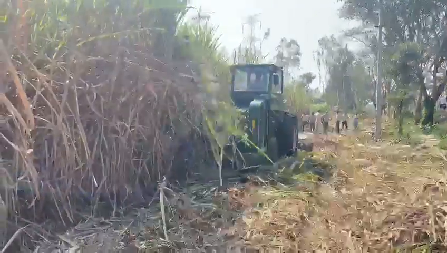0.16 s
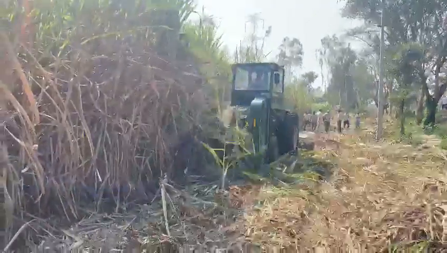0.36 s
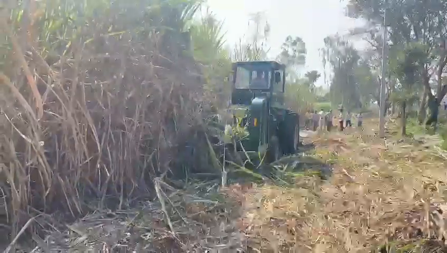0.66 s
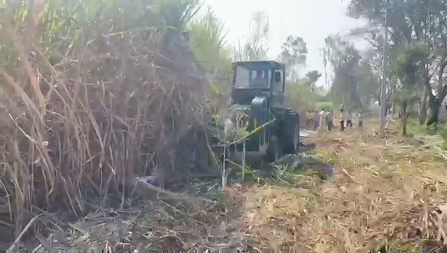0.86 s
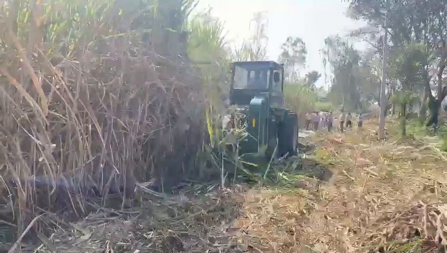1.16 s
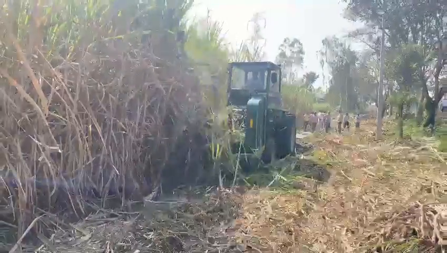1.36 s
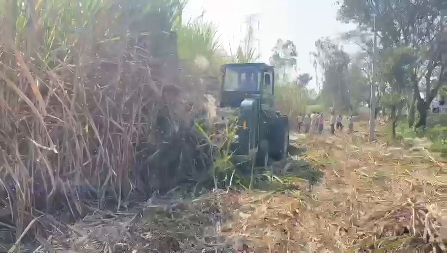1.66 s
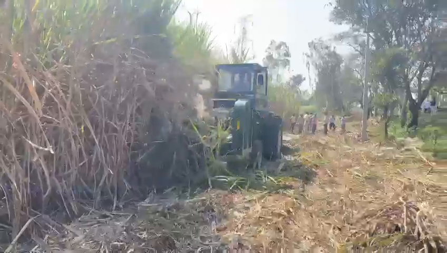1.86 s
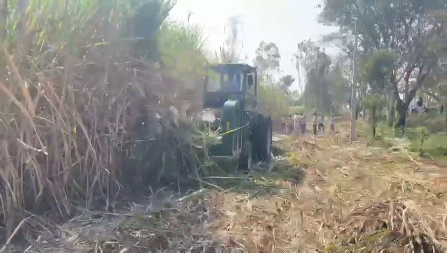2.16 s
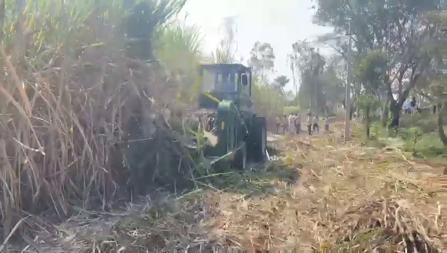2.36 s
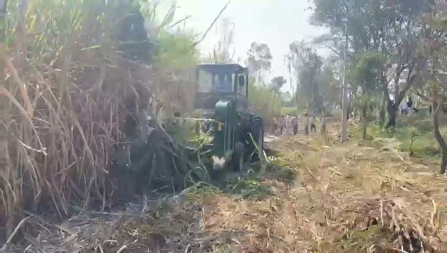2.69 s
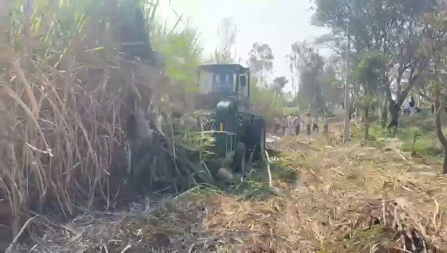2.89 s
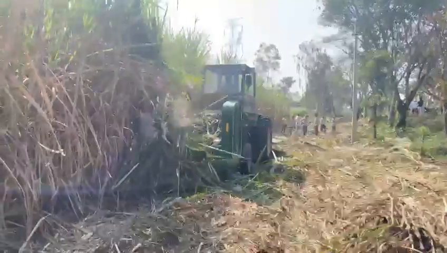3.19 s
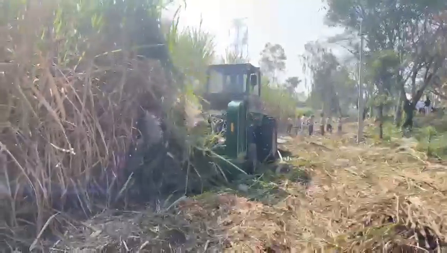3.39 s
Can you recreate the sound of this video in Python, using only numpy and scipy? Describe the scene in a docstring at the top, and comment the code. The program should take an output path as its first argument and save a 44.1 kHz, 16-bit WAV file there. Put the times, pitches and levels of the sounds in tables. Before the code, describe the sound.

A cane harvester roars steadily, its diesel throbbing as blades knock and dry cane crackles

```python
"""A cane field: a cane harvester works some way off from a phone with two microphone ports.
Sine tones make the six-cylinder diesel's throb, the pumps and the fan; noise puffing with each firing
makes the roar over bare ground. Decaying sines make thuds and blade knocks, dense grains snap cane,
and torn dry leaves are noise and clicks hissing in gusts."""
import sys
import numpy as np
from scipy import signal
from scipy.fft import rfft, irfft
from scipy.io import wavfile
from scipy.ndimage import uniform_filter1d

SR = 44100
rng = np.random.default_rng(int(sys.argv[2]) if len(sys.argv) > 2 else 0)


def gain_from_decibels(decibels):
    """Convert decibel values to linear amplitude factors."""
    exponent = np.asarray(decibels, float) / 20
    return 10 ** exponent


def waveform_to_disk(signal):
    """Save audio, clipped to [-1, 1], as 16-bit WAV at the path in sys.argv[1]."""
    frames = np.transpose(np.atleast_2d(signal))
    scaled = np.clip(frames, -1, 1) * 32767
    samples = np.round(scaled).astype(np.int16)
    wavfile.write(sys.argv[1], SR, samples)


N = 156114
HZ = np.maximum(np.fft.rfftfreq(N, 1 / SR), 1)

# Source levels are ahead of the gains in ports() and scene().
# Exhaust tones. Each row: multiple of the engine cycle, level in dB, level wander in dB.
EXHAUST_ORDERS = [(4, -42, 2), (7, -37, -3.5), (8, -37.5, 0.5), (9, -35, 2.5), (10, -39, 4.5),
                  (12, -38.5, 2)]
# Firing tone. Each row: time in seconds, level in dB.
FIRING_LEVEL = [(0.0, -27.5), (0.34, -23.5), (0.8, -26.5), (0.92, -39), (1.3, -33.5), (1.6, -29.5),
                (1.88, -45), (1.99, -26), (2.07, -36), (2.28, -27), (2.45, -27.5), (2.8, -27),
                (2.92, -30.5), (3.19, -26), (3.4, -26.5), (3.54, -33)]
# Hydraulic pumps and fan: pitches in Hz.
HUM_HZ = (385.3, 806.8)
# The same hums. Each row: level in dB, pitch wander as a share, level wander in dB.
HUMS = [(-31, .0008, 0.4), (-43, 0.003, 1)]
# Wavering pump hum. Each row: time in seconds, level in dB.
PUMP_LEVEL = [(0.0, -33), (0.5, -35), (0.9, -34), (1.25, -34.5), (1.45, -28), (1.65, -34), (2.1, -35),
              (2.26, -27.5), (2.36, -37), (2.8, -36), (3.54, -33)]
# Machine roar spectrum. Each row: frequency in Hz, relative density in dB per Hz.
ROAR_COLOUR = [(20, -44), (32, -31), (42, -18), (55, -2), (70, -3), (105, -4.5), (150, -3), (280, -7.5),
               (385, -10), (480, -7), (640, -3), (790, -12.5), (1000, -8), (1500, -10), (2000, -9),
               (3000, -14.5), (4500, -22), (7000, -42.5), (12000, -28)]
# Machine roar. Each row: time in seconds, level in dB, tilt in dB per octave.
ROAR_LEVEL = [(0, -19.5, -.5), (.33, -19.5, 0.5), (.8, -19, -0.5), (1.2, -19.5, -0.5), (1.75, -18, 0.6),
              (2.1, -18, -0.5), (2.6, -21, 0.9), (2.86, -21, 0.2), (3.2, -20.5, 0.3), (3.54, -19.5, 1)]
# Cut cane landing in the machine. Each row: start in seconds, peak in dB, pitch in Hz.
THUDS = [(1.43, -19, 153), (1.87, -19, 154), (2.13, -12.5, 95), (2.84, -14.5, 621)]
# Snapping cane. Each row: time in seconds, level in dB.
SNAP_LEVEL = [(0.0, -27.5), (0.38, -30), (0.8, -31.5), (1.2, -30.5), (1.5, -26.5), (1.8, -27), (2.3, -31.5),
              (2.8, -33.5), (3.1, -30), (3.3, -28.5), (3.54, -31)]
# Snap grains. Each row: pitch in Hz, relative level in dB.
SNAP_GRAINS = [(1300, -9), (1900, -4), (2900, 1.5), (3500, 3), (4500, 3)]
# Torn leaf spectrum. Each row: frequency in Hz, relative density in dB per Hz.
LEAF_COLOUR = [(800, 7), (2000, 4), (3000, -7), (4500, 2), (6000, -2.5), (8000, -0.5), (11000, 0),
               (13000, -6)]
# Torn leaves. Each row: time in seconds, level in dB, extra tilt in dB per octave.
LEAF_LEVEL = [(0.0, -29.5, -0.5), (0.1, -31, -1), (0.5, -33, 0), (0.9, -30, -0.5), (1.2, -32.5, -1),
              (1.6, -27, 1.5), (1.81, -25, 1), (1.9, -28.5, -0.5), (2.3, -25.5, -1), (2.64, -25.5, 0),
              (2.78, -28, -1), (2.85, -25.5, -1), (3.1, -26.5, -0.5), (3.28, -28.5, 2), (3.33, -23, -0.5),
              (3.39, -28.5, 0), (3.54, -26.5, 0)]
# Stalk and blade modes. Each row: multiple of the ring pitch, relative level in dB, T60 in seconds.
STALK_MODES = [(0.93, -0.5, .015), (1.04, 3.5, 0.021), (1.2, -1, 0.016), (1.45, 0.5, 0.017), (1.7, -3, .01),
               (2, 3, 0.021), (2.9, -15, 0.009), (3.3, -5, 0.016)]
# Blade knocks, mostly loud, one faint. Each row: start in seconds, peak in dB, ring pitch in Hz.
KNOCKS = [(0.153, -8.5, 930), (0.3, -1.5, 995), (1.007, -24, 1300), (1.694, -9, 1670), (1.811, -10.5, 1420),
          (1.966, -10, 1090), (2.101, -7, 1420), (2.374, -12, 915), (2.806, -6, 1460)]
# Ground echo delays in seconds: left port, right port.
GROUND_S = (2.1e-4, 1.83e-4)
# Scattered sound, unlike at the two ports. Each row: frequency in Hz, gain in dB.
SCATTER_COLOUR = [(50, -9.5), (300, -10), (1000, -8), (3000, -5), (6000, 8.5), (10000, -11)]
# Machine balance drift. Each row: time in seconds, left minus right in dB.
MACHINE_PAN = [(0, -3), (1.1, -3), (2.0, -2), (2.6, -2), (3.54, -3)]
# Shading by the phone's body. Each row: frequency in Hz, extra left minus right in dB.
MACHINE_SHADE = [(60, -0.1), (200, -0.1), (400, -1), (700, -0.9), (1300, .3), (3000, 3), (8000, -3.5)]
# Colour of the sum of the ports. Each row: frequency in Hz, gain in dB.
SUM_COLOUR = [(2000, 0), (2500, -2.5), (2900, 3.5), (4500, -3), (5300, -4.5), (6000, -11.5), (6500, 2),
              (7900, -1.5), (8400, -3), (9000, -3), (9500, -9), (9800, 0), (11600, 2), (11880, -12),
              (12050, -70)]
# Colour of the difference of the ports, ending lower. Each row: frequency in Hz, gain in dB.
DIFFERENCE_COLOUR = [(3000, 0), (3900, -4), (5000, -1), (6200, -3), (6800, 0), (7400, -1.5), (10000, 3.5),
                     (10330, 2), (10450, -60)]


def curve(table):
    """Straight lines in time through (s, value) rows."""
    return np.interp(np.arange(N) / SR, *np.array(table).T)


def colour(table):
    """Gain per frequency bin from (Hz, dB) points, straight in log frequency."""
    hz, db = np.array(table).T
    return gain_from_decibels(np.interp(np.log(HZ), np.log(hz), db))


def unit(x):
    """Scale to rms 1."""
    return x / np.sqrt(np.mean(x ** 2))


def walk(rate_hz):
    """Random levels held 1 / rate_hz seconds and slewed twice; mean 0, rms 1."""
    hold = int(SR / rate_hz)
    steps = np.repeat(rng.standard_normal(N // hold + 1), hold)
    slewed = uniform_filter1d(uniform_filter1d(steps, hold), hold)[:N]
    return unit(slewed - slewed.mean())


def flicker(x, table, shared_db, own_db, rate_hz, tilt_db_per_octave, pivot_hz):
    """Coloured rows of x in half-octave bands wandering together and alone, tilted about a pivot; rms 1."""
    spec = rfft(x) * colour(table)
    shared = walk(rate_hz)
    out = 0
    for k in np.arange(8, 28):  # band centres at 2 ** (k / 2) Hz
        band = np.clip(1 - np.abs(2 * np.log2(HZ) - k), 0, 1)
        slope_db = tilt_db_per_octave * (k / 2 - np.log2(pivot_hz))
        level_db = shared_db * shared + own_db * walk(rate_hz) + slope_db
        out = out + irfft(spec * band, N) * gain_from_decibels(level_db)
    return unit(out)


def scatter(per_s, spread_db):
    """Random clicks of either sign; sizes in dB spread exponentially up from 0, the largest capped."""
    draw = rng.random((3, N))
    size_db = spread_db * np.minimum(-np.log(1 - draw[2]), 3.5)
    return (draw[0] < per_s / SR) * np.sign(draw[1] - 0.5) * gain_from_decibels(size_db)


def tone(turns, db):
    """Sine of rms level db along a phase in turns; rows start at their own random phases."""
    return np.sqrt(2) * gain_from_decibels(db) * np.sin(2 * np.pi * (turns + rng.random((3, 1))))


def engine_cycle():
    """Four-stroke cycles turned so far, at a slightly wandering speed."""
    cycle_hz = 16.8
    return np.cumsum(cycle_hz * (1 + 0.00095 * walk(1.53))) / SR


def hums():
    """Hydraulic pumps and fan as sines wandering in pitch and level; rows: direct, scattered left, right."""
    out = tone(np.cumsum(558 * (1 + 0.007 * walk(9))) / SR, curve(PUMP_LEVEL) + 3.5 * walk(12))
    for hz, (db, share, wander_db) in zip(HUM_HZ, HUMS):
        out += tone(np.cumsum(hz * (1 + share * walk(3))) / SR, db + wander_db * walk(5.8))
    return out


def exhaust(cycle):
    """Tones at multiples of the engine cycle, wandering in phase and level; rows as in hums()."""
    out = tone(6 * cycle + 0.016 * walk(7.44), curve(FIRING_LEVEL) + 1.6 * walk(15))  # six firings a cycle
    out += tone(3 * cycle, -28 + 1.3 * walk(6))
    for order, db, wander_db in EXHAUST_ORDERS:
        out += tone(order * cycle + 0.075 * walk(6), db + wander_db * walk(7.33))
    return out


def roar(cycle):
    """Coloured noise that jumps at every firing and decays until the next; rows as in hums()."""
    puff_share, puff_scatter_db, decay_firings = 0.11, 2, 0.89
    firing = 6 * cycle
    size = gain_from_decibels(puff_scatter_db * rng.standard_normal(N // 100))[firing.astype(int)]
    puffs = 1 + puff_share * size * np.exp(-(firing % 1) / decay_firings)
    table = np.array(ROAR_LEVEL)
    noise = flicker(rng.standard_normal((3, N)) * puffs, ROAR_COLOUR, shared_db=0.75, own_db=1.1,
                    rate_hz=14, tilt_db_per_octave=curve(table[:, ::2]), pivot_hz=800)
    return noise * gain_from_decibels(curve(table[:, :2]))


def thuds():
    """Cut cane lands in the hollow machine: each thud a sine with a soft rise and exponential decay."""
    rise_s, t60_s = 0.016, 0.13
    out = 0
    for start_s, db, hz in THUDS:
        t = np.maximum(np.arange(N) / SR - start_s, 0)
        decay = np.exp(-np.log(1000) * np.maximum(t - rise_s, 0) / t60_s)
        out = out + gain_from_decibels(db) * np.sin(2 * np.pi * hz * t) * np.minimum(t / rise_s, 1) * decay
    return out


def snaps():
    """Breaking cane fibre: dense short decaying sine grains; rows as in hums()."""
    snaps_per_s, spread_db, decay_cycles = 700, 3.5, 2.35
    t = np.arange(400) / SR
    out = 0
    for hz, db in SNAP_GRAINS:
        grain = np.sin(2 * np.pi * hz * t) * np.exp(-t * hz / decay_cycles)
        hits = np.array([scatter(snaps_per_s / len(SNAP_GRAINS), spread_db) for _ in range(3)])
        grains = unit(signal.fftconvolve(hits, grain[None])[:, :N])
        out = out + gain_from_decibels(db + 2.9 * walk(14)) * grains
    return unit(out) * gain_from_decibels(curve(SNAP_LEVEL))


def leaves():
    """Shredded dry leaves: hiss plus dense clicks, coloured, in gusts; rows as in hums()."""
    crackles_per_s, crackle_db, spread_db = 3400, -2, 3.8  # crackle level re the hiss
    raw = []
    for _ in range(3):
        crackle = unit(scatter(crackles_per_s, spread_db))
        raw.append(rng.standard_normal(N) + gain_from_decibels(crackle_db) * crackle)
    table = np.array(LEAF_LEVEL)
    hiss = flicker(np.array(raw), LEAF_COLOUR, shared_db=1.5, own_db=1.83,
                   rate_hz=18, tilt_db_per_octave=curve(table[:, ::2]), pivot_hz=11000)
    return hiss * gain_from_decibels(curve(table[:, :2]))


def ring(hz):
    """A quick blow rings the stalk modes, each decaying at its own rate; peak 1."""
    t = np.arange(2600) / SR
    out = 0
    for multiple, db, t60_s in STALK_MODES:
        out = out + gain_from_decibels(db) * np.sin(2 * np.pi * multiple * hz * t) * np.exp(-np.log(1000) * t / t60_s)
    out = out * np.minimum(t / 0.0012, 1)  # 1.2 ms rise
    return out / np.abs(out).max()


def blades():
    """Blades strike stalks: knocks at set times, mostly loud, one faint; small ones at random times."""
    small_per_s, small_db, spread_db = 30, -23.5, 3.4  # small_db: the smallest
    out = np.zeros(N + 2600)
    for start_s, db, hz in KNOCKS:
        i = int(start_s * SR)
        out[i:i + 2600] += gain_from_decibels(db) * ring(hz)
    for hz in (663, 793, 955, 1512, 1816):
        hits = scatter(small_per_s / 5, spread_db)
        out[:N] += gain_from_decibels(small_db) * signal.fftconvolve(hits, ring(hz))[:N]
    return out[:N]


def ports(x, lag_s, balance, ground_db):
    """One source at both ports: left lag, balance, low-passed ground echo, each port's own scattered part."""
    ground_top_hz = 4020
    spec = rfft(x)
    late = lambda s: np.exp(-2j * np.pi * HZ * s)
    out = []
    for side, echo_s, own in zip((1, -1), GROUND_S, spec[1:]):  # left, right
        ground = 1 + gain_from_decibels(ground_db) * late(echo_s) / (1 + (HZ / ground_top_hz) ** 4)
        direct = spec[0] * late(side * lag_s / 2) * ground
        out.append(irfft(balance ** (side / 2) * (direct + own * colour(SCATTER_COLOUR)), N))
    return np.array(out)


def scene():
    """Machine and leaves reach the ports from different sides."""
    cycle = engine_cycle()
    machine = hums() + exhaust(cycle) + roar(cycle) + snaps()
    machine[0] += thuds() + blades()  # direct sound only
    pan_db = curve(MACHINE_PAN)
    gain = gain_from_decibels(-4.0 + np.array([pan_db, -pan_db]) / 2)
    # machine: left port early but shaded; leaves: left port late
    machine_heard = gain * ports(machine, lag_s=-0.000077, balance=colour(MACHINE_SHADE), ground_db=-5.5)
    return machine_heard + ports(leaves(), lag_s=2.83e-4, balance=1, ground_db=-42)


def roll_off(x):
    """The treble ends steeply here."""
    return signal.sosfilt(signal.butter(12, 12890, fs=SR, output="sos"), x)


def record(dry):
    """Colours the sum and the difference of the channels with dips and top cuts."""
    mid = irfft(rfft(dry[0] + dry[1]) * colour(SUM_COLOUR), N) / 2
    side = irfft(rfft(dry[0] - dry[1]) * colour(DIFFERENCE_COLOUR), N) / 2
    return roll_off(np.array([mid + side, mid - side]))


dry = scene()
out = record(dry)
waveform_to_disk(out)
```